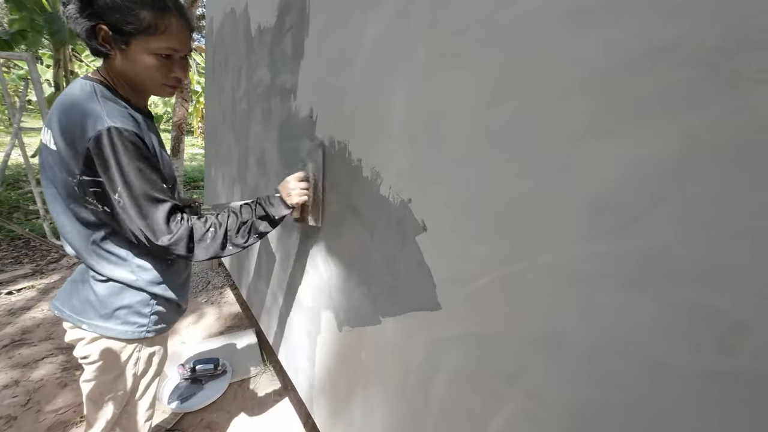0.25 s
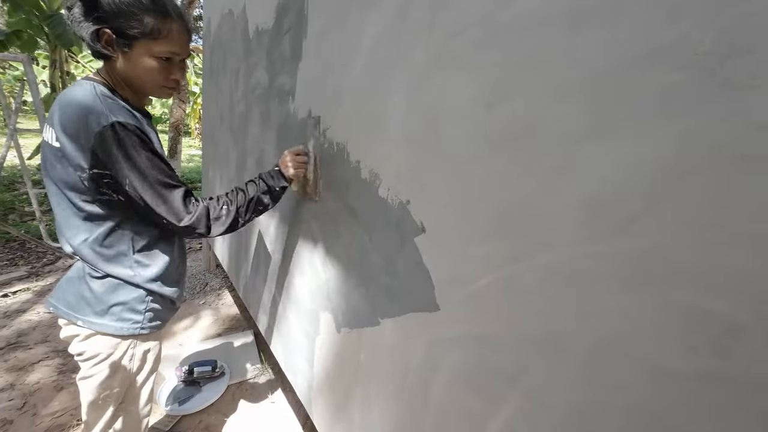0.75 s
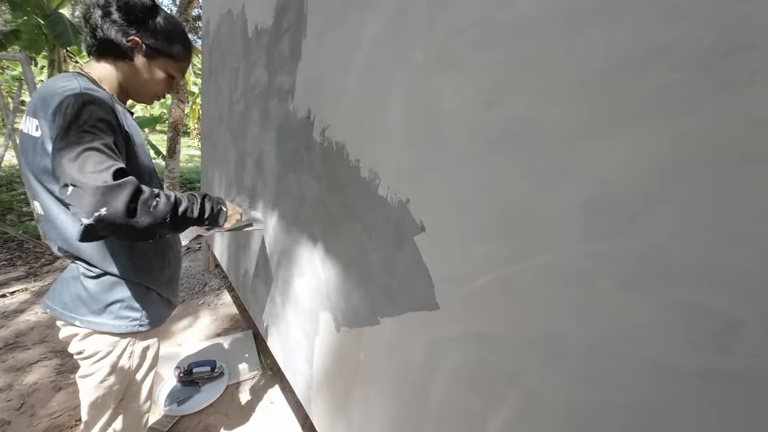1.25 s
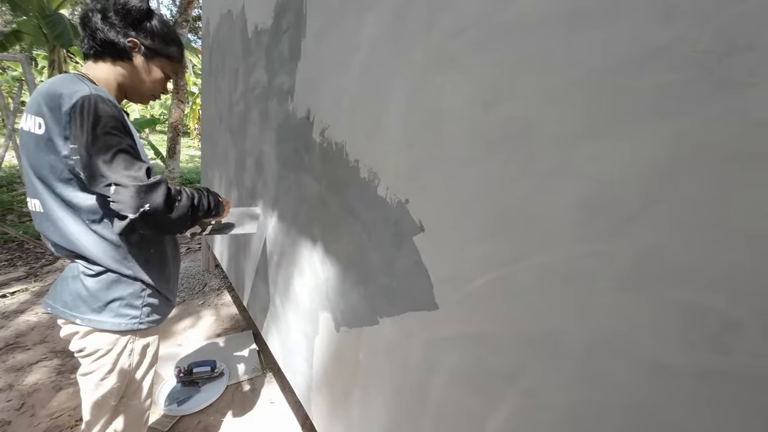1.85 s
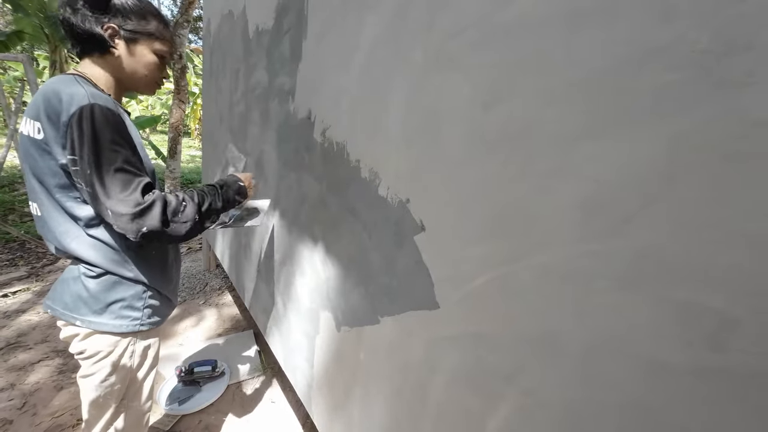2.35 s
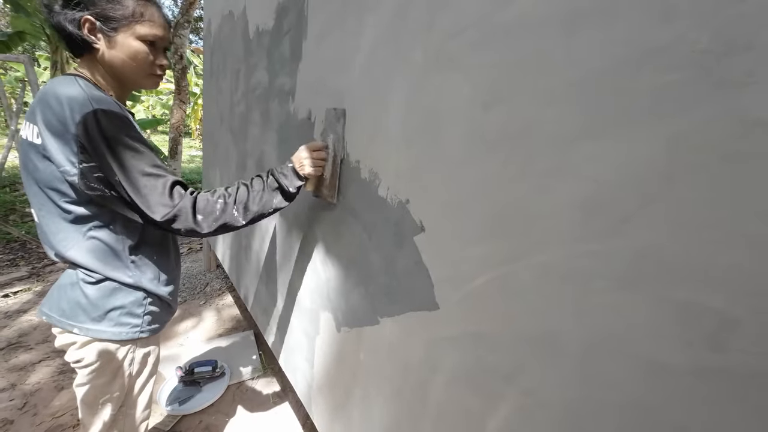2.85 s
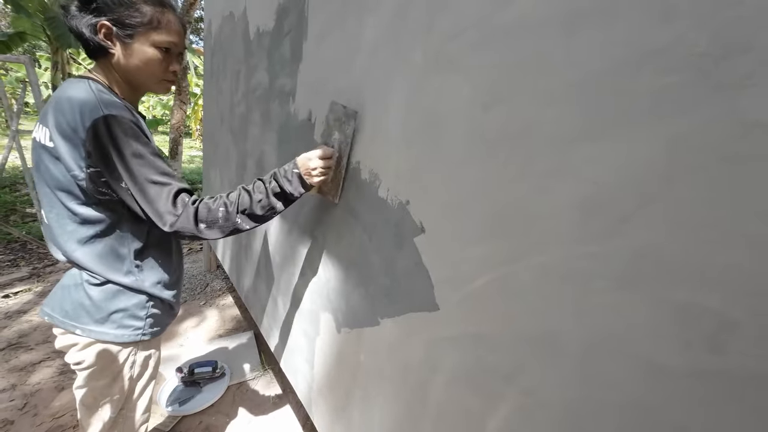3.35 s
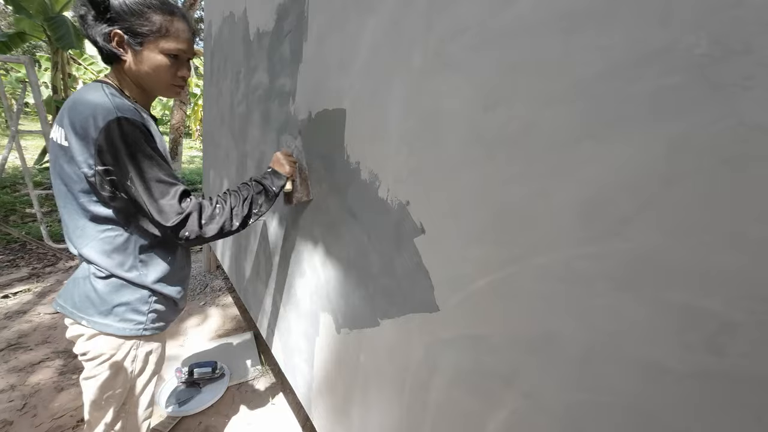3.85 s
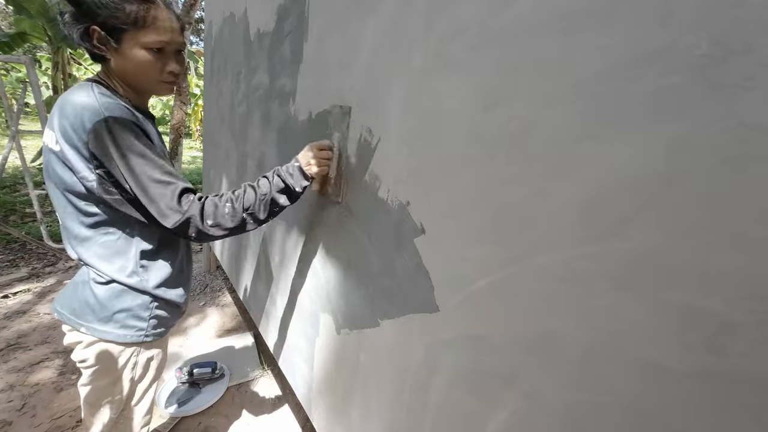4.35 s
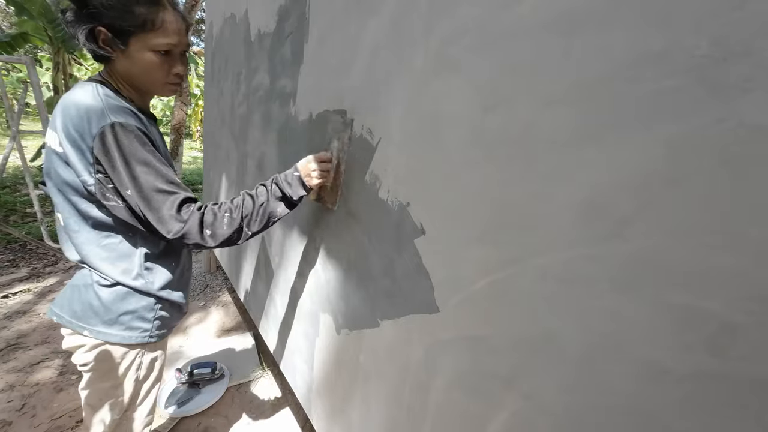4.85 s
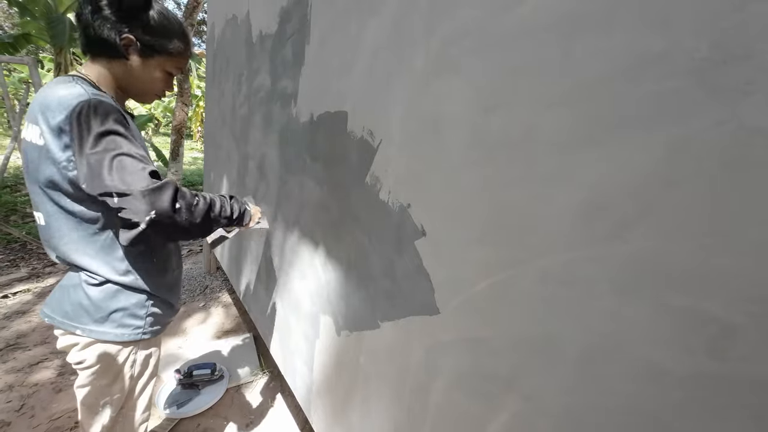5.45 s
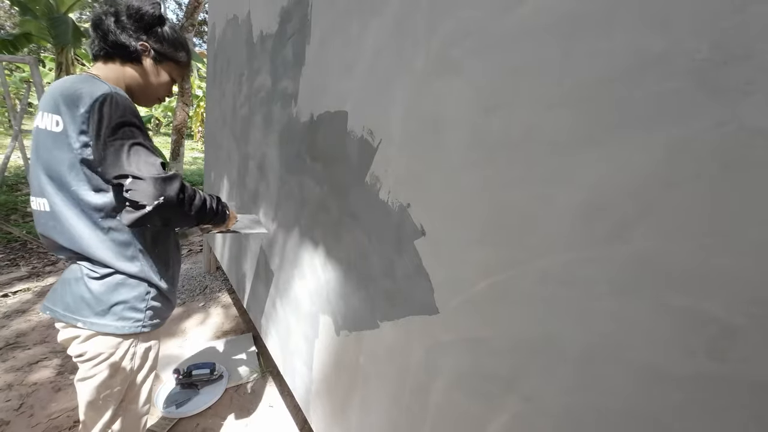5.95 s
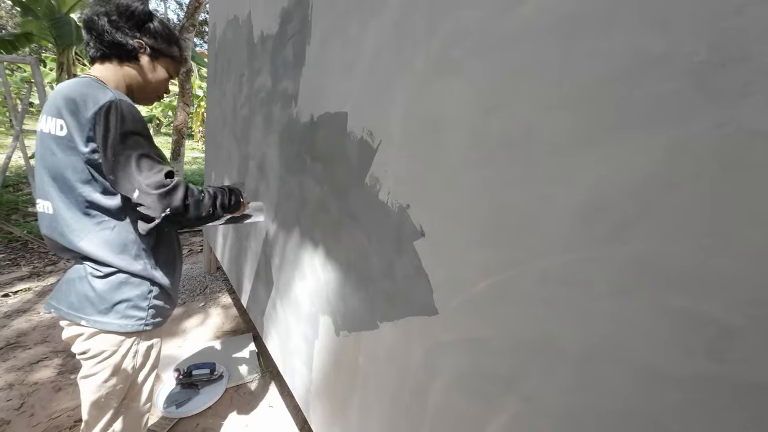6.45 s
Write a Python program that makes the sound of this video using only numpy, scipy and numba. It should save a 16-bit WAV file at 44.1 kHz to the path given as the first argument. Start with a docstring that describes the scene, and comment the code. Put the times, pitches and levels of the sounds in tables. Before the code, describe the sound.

A steel trowel spreads sandy plaster on a board wall, close to the microphone. A few gritty, hissing strokes come first, then a ringing scrape of steel on steel as more plaster is gathered from a second tool. After a pause, more short strokes follow with light knocks and brief squeaks, then another metallic scoop. A distant engine hums throughout, fading in and out over soft outdoor rumble.

```python
"""A steel trowel spreads sandy plaster on an outdoor board wall and scrapes more off a second tool.
Sand grains catch under its edge and make the blade ring. The blade knocks as it lands, its edge
sings now and then, and the board groans under a hard push.
An engine hums some way off, fading in and out, over a soft outdoor background."""
import sys
import numpy as np
from scipy import signal
from scipy.fft import rfft, irfft
from scipy.io import wavfile
from scipy.ndimage import uniform_filter1d, map_coordinates
from numba import njit

SR = 44100
rng = np.random.default_rng(int(sys.argv[2]) if len(sys.argv) > 2 else 0)


def master(y):
    """Save y as 16-bit WAV."""
    cut = np.clip(np.atleast_2d(y).T, -1, 1)
    pcm = np.round(cut * 32767)  # scale
    wavfile.write(sys.argv[1], SR, pcm.astype(np.int16))


N = 295029
TIME, FREQ = np.arange(N) / SR, np.fft.rfftfreq(N, 1 / SR)


def undb(db):
    """Turn decibels into a volume factor."""
    return 10 ** (np.asarray(db) / 20)


def curve(points):
    """Fill in a (time, value) table at every sample."""
    return np.interp(TIME, *np.transpose(points))


def across(points):
    """Fill in a (frequency, value) table at every frequency."""
    hz, value = np.transpose(points)
    return np.interp(np.log(FREQ + 1), np.log(hz), value)


def colour(x, points):
    """Shape the tone by a (frequency, level) table."""
    cepstrum = irfft(np.log(undb(across(points))), N)
    fold = np.r_[1, np.full(N // 2, 2), np.zeros(N - N // 2 - 1)]  # no ringing ahead of a sound
    response = irfft(np.exp(rfft(cepstrum * fold)), N)[:SR // 5]
    return irfft(rfft(x, 2 * N) * rfft(response, 2 * N))[..., :N]


def band(x, lo, hi, order=2):
    """Keep what lies between two frequencies."""
    return signal.sosfilt(signal.butter(order, [lo, min(hi, .49 * SR)], "band", fs=SR, output="sos"), x)


def below(x, hz):
    """Keep what lies under a frequency, without delay."""
    return signal.sosfiltfilt(signal.butter(2, hz, fs=SR, output="sos"), x)


def unit(x, lo, hi):
    """Scale a sound to strength 1 between two frequencies."""
    return x / np.std(band(x, lo, hi, order=4))


def walk(rate):
    """A smooth random wobble, roughly 1 in size, with `rate` steps a second."""
    k = int(SR / rate)
    steps = np.repeat(rng.standard_normal(N // k + 2), k)
    return 0.884 * uniform_filter1d(uniform_filter1d(steps, k), k)[:N]


@njit
def resonance(x, hz, width):
    """A filter that rings at a moving pitch; a narrow width rings longer."""
    out, band_state, low_state = np.empty(len(x)), 0., 0.
    for i in range(len(x)):
        tuning, damping = np.tan(np.pi * hz[i] / SR), width / hz[i]
        swing = (band_state + tuning * (x[i] - low_state)) / (1 + tuning * (tuning + damping))
        band_state = 2 * swing - band_state
        low_state += 2 * tuning * swing
        out[i] = damping * swing
    return out


def pressure(start, lean_s, ease_s, rise_db=8, fall_db=6.5, lift_s=0.014):
    """One stroke: the edge bites, the hand leans in, eases off and lifts."""
    t = TIME - start
    db = np.interp(t, [0, lean_s, lean_s + ease_s], [-rise_db, 0, -fall_db])
    bite = np.clip(t / (.4 * lean_s), 0, 1)
    lift = np.exp(-np.maximum(t - lean_s - ease_s, 0) / lift_s)
    return undb(db) * bite * lift


def scrape(strokes, modes, tone, grains_per_s, scatter_db, chatter_db, ring_db, drift, rasp_db, hiss_db):
    """Sand grains catch under the edge in uneven bursts and make the blade ring."""
    rasp, hiss, sizzle = np.zeros((3, N))
    for start, lean_s, ease_s, db, fine_db in strokes:
        contact = undb(db) * pressure(start, lean_s, ease_s)
        rasp += contact
        hiss += contact * undb(fine_db)
        sizzle += contact * undb(2.31 * fine_db + 3)  # light, fast strokes favour the finest grains
    sizes = undb(scatter_db * np.minimum(rng.exponential(size=N), 4)) * rng.choice([-1, 1], N)
    grains = sizes * (rng.random(N) < grains_per_s / SR) * undb(chatter_db * walk(140))
    # the ringing tones wander and trade strength as the contact moves along the blade
    flex, ring = walk(9), np.zeros(N)
    for hz, width, db in modes:
        strength = undb(db + 2 * walk(25))
        ring += strength * resonance(grains, hz * (1 + drift * (flex + walk(16))), float(width))
    sound = colour(0.29 * grains + undb(ring_db) * ring, tone)
    low = below(sound, 2410)
    body = unit(low, 700, 3000)
    # the crowded high tones flare up in changing patches
    treble, patches = rfft(sound - low), np.zeros(N)
    for hz in range(800, 17000, 800):
        window = np.maximum(1 - abs(FREQ - hz) / 800, 0)
        patches += undb(3 * walk(35)) * irfft(treble * window, N)
    sand = unit(patches, 4000, 12000)
    coarse = below(sand, 8500)
    return undb(rasp_db) * rasp * body + undb(hiss_db) * (hiss * coarse + sizzle * (sand - coarse))


def wall_strokes():
    """The trowel drags sandy plaster over the wall."""
    # hand strokes: start/s, leaning in/s, easing off/s, relative peak/dB, hiss against that peak/dB
    strokes = [ (0.0, 0.0046, 0.035, -38, -11.5), (.05, 0.097, 0.079, -39, -7.5),
               (.526, 0.0053, 0.0094, -35, -12), (.538, 0.03, 0.034, -50.5, -1.5),
               (.628, 0.021, 0.032, -40, -8), (.675, 0.064, 0.051, -36.5, -7.5),
               (.775, .065, 0.056, -43, -5.5), (3.04, 0.027, 0.037, -58.5, -2),
               (3.128, 0.059, 0.026, -50, -2.5), (3.514, 0.015, 0.043, -31, -15),
               (3.55, .07, 0.0045, -37.5, -5.5), (3.64, 0.015, 0.11, -53, -6.5),
               (3.71, 0.041, 0.0098, -42.5, -10.5), (3.785, 0.025, 0.0056, -43.5, -10),
               (3.853, .008, 0.035, -47.5, -11), (3.89, 0.044, .012, -48.5, -10),
               (4.335, 0.09, 0.047, -37.5, -7), (4.693, 0.0041, 0.0074, -44, -5),
               (4.738, 0.074, 0.0063, -41, -2), (4.87, 0.081, 0.029, -48, -5.5),
               (5.005, 0.078, 0.036, -44, -10), (5.115, 0.037, 0.035, -49, -7.5)]
    # ringing tones of the blade on the wall: f/Hz, width/Hz, level/dB
    modes = [(355, 50, -3), (860, 120, 0), (1170, 140, -3), (1300, 150, 0), (1642, 90, 4), (1850, 70, 1.5),
             (2240, 180, -2), (2800, 200, -5), (3560, 200, -10), (4925, 67, -17), (6300, 200, -14)]
    # tone of the scrape: f/Hz, level/dB
    tone = [(150, -44), (280, -17), (370, 7), (500, -27), (680, -8), (870, 1), (1300, 3.5), (2100, -5),
            (2900, -12), (4200, -13), (6200, -10), (9000, -16.5), (11000, -12), (16000, -21.5)]
    return scrape(strokes, modes, tone, grains_per_s=7000, scatter_db=3, chatter_db=1.5,
                  ring_db=-1.5, drift=.035, rasp_db=-3.5, hiss_db=0)


def rubbed(start, end, from_hz, to_hz, width, db):
    """Rubbing keeps one rough tone going; it swells and fades."""
    first, size = int(max(start, 0) * SR), max(int((end - start) * SR), SR // 50)
    hz = np.linspace(from_hz, to_hz, size)
    arch = np.sin(np.linspace(0, np.pi, size)).clip(0) ** 0.59
    tone = resonance(rng.standard_normal(size), hz, float(width))
    tone = resonance(tone, hz, float(width)) * arch
    return np.pad(undb(db) * tone / np.std(tone), (first, N))[:N]


def board_groans():
    """The board bends and groans under a hard push."""
    # pushes: start/s, end/s, f/Hz, width/Hz, relative level/dB
    pushes = [(0, 0.08, 355, 70.4, -49.5), (0.61, 0.743, 362, 69.4, -60), (3.513, 3.59, 348, 140, -51),
              (4.35, 4.47, 443, 200, -47.5), (4.36, 4.499, 89.5, 90.5, -38.5)]
    return undb(-1) * sum(rubbed(start, end, hz, hz, width, db) for start, end, hz, width, db in pushes)


def engine(start_hz=87.8, settled_hz=79.5, sag_s=5.6):
    """An engine slows a little. Only its lowest tones carry this far, fading in and out on the way."""
    # the tone at the firing rate: t/s, level/dB
    fundamental = [(0.0, -39), (0.33, -36), (1.15, -35.5), (1.53, -31), (1.96, -39.5), (2.1, -36),
                   (2.46, -38), (2.55, -43.5), (2.64, -64), (2.74, -47.5), (2.98, -40), (3.28, -36),
                   (3.99, -40.5), (4.45, -33), (4.79, -37.5), (5.22, -53.5), (5.5, -45.5), (6.69, -41)]
    # the tone an octave above: t/s, level/dB
    octave = [(0, -55.5), (1.2, -50), (2.4, -48), (2.65, -42.5), (3.5, -42), (3.75, -33.5), (4.1, -40.5),
              (4.3, -32), (4.9, -42.5), (5.55, -54), (5.78, -39), (6, -43), (6.69, -37)]
    # weaker tones: multiple of the firing rate, level/dB
    overtones = [(4 / 3, -62.5), (7 / 3, -65)]
    # other tones that swell in the hum: start/s, end/s, f/Hz, level/dB
    swells = [(1.55, 2.594, 200.7, -51.5), (2.162, 3.312, 281.8, -52.5), (4.902, 5.64, 234.4, -51.5),
              (5.8, 6.693, 275, -63)]
    firing_hz = settled_hz + (start_hz - settled_hz) * np.exp(-TIME / sag_s)
    phase = 2 * np.pi * np.cumsum(firing_hz * (1 + 0.0021 * walk(14))) / SR
    hum = undb(curve(fundamental) + walk(25)) * np.sin(phase)
    hum += undb(curve(octave) + walk(25)) * np.sin(2 * phase + rng.uniform(0, 2 * np.pi))
    for multiple, db in overtones:
        hum += undb(db + 3 * walk(1.4)) * np.sin(multiple * phase + 0.52 * walk(4.4))
    for start, end, hz, db in swells:
        swell = np.sin(np.pi * np.clip((TIME - start) / (end - start), 0, 1))
        hum += undb(db) * swell * np.sin(2 * np.pi * hz * TIME + 0.75 * walk(24.19))
    return np.sqrt(2) * hum


def outdoors(rumble_db=-47, wind_db=-55, wide_hz=5500):
    """Distant work noise and low rumble, with a little wind on each microphone."""
    # loudness of the distant noise: t/s, level/dB
    air_level = [(0, -58), (2, -56), (4.9, -53), (6.69, -55.5)]
    # its tone: f/Hz, level/dB
    air_tone = [(120, -21), (240, -8), (330, -10.5), (500, -9), (680, -13.5), (850, -8), (1300, -12),
                (2100, -15), (3000, -22), (4000, -28), (5600, -27), (8800, -38), (10500, -36), (12500, -55),
                (16000, -64)]
    # tone of the rumble: f/Hz, level/dB
    rumble_tone = [(15, -8), (25, -2), (45, 1), (70, -3), (130, -2), (200, -4), (260, -11), (340, -25),
                   (1000, -70)]
    mid, side = (colour(rng.standard_normal(N) * undb(walk(40)), air_tone) for _ in range(2))
    side = irfft(rfft(side) * np.clip((FREQ / wide_hz) ** 2, 0.15, 1), N)  # highs spread wider
    air = unit(mid + np.array([[1], [-1]]) * side, 300, 3000)
    # far machinery swells once, peaking at 5.46 s
    machinery_db = -53 - 10 * np.log10(1 + ((TIME - 5.46) / 0.62) ** 2)
    machinery = band(rng.standard_normal(N), 225, 550) * undb(1.5 * walk(17))
    rumble = colour(rng.standard_normal(N), rumble_tone) * undb(2 * walk(3.06))
    wind = band(rng.standard_normal((2, N)), 12, 62)
    lows = undb(machinery_db) * machinery / np.std(machinery) + undb(rumble_db) * rumble / np.std(rumble)
    return air * undb(curve(air_level)) + lows + undb(wind_db) * wind / np.std(wind)


def edge_singing(glide=0.037, width_hz=120):
    """The edge sings for a moment, sinking in pitch as the blade tilts."""
    # notes: start/s, length/s, f/Hz, relative level/dB
    notes = [(.095, 0.15, 1146, -44), (.12, 0.13, 1730, -43), (.129, 0.061, 2460, -45),
             (.54, 0.053, 2130, -45), (0.619, 0.053, 2165, -46), (0.717, 0.044, 2005, -39.5),
             (1.415, 0.066, 1405, -50), (3.169, 0.086, 1374, -47.5), (3.517, 0.041, 1130, -43),
             (4.28, 0.032, 1495, -42), (4.413, 0.059, 1580, -42), (4.772, 0.053, 2230, -42),
             (4.934, 0.041, 905, -44.5), (5.66, 0.165, 2020, -43.5), (5.696, .095, 1506, -48.5),
             (5.748, 0.091, 2780, -60)]
    return undb(-3) * sum(rubbed(s, s + length, hz * (1 + glide / 2), hz * (1 - glide / 2), width_hz, db)
                          for s, length, hz, db in notes)


def knocks(crunch_s=0.0067, ring_db=-9, gain_db=-14):
    """The blade lands or trips on a big grain: a tick, a crunch of sand and a short ring."""
    # hits: t/s, relative level/dB, treble boost/dB
    hits = [(0.118, -26.5, 0), (0.222, -33, -10), (0.526, -17.5, -10), (0.627, -31.5, 0), (1.419, -30, -21),
            (3.517, -19, -21), (3.619, -17.5, 5), (3.752, -39.5, 9), (3.812, -35, 1), (3.853, -33, 1),
            (4.282, -15, 0.5), (4.286, -22, -19), (4.445, -20, -15), (4.694, -37, 2), (4.877, -27.5, -16),
            (5.575, -30, -9)]
    # tone of the crunch: f/Hz, level/dB
    tone = [(150, -18), (400, -9), (650, -10), (900, -3), (1400, -1), (2000, 0), (3200, -10), (6000, -12),
            (8500, -24), (11000, -26), (16000, -40)]
    # ringing tones of the free blade: f/Hz, level/dB, time to fade by 60 dB/s
    modes = [(1168, -13, .045), (1464, -7, .09), (1669, -5, .045), (1879, -4, .035), (1997, 0, .03),
             (2498, -1, .022), (2670, -10, .05), (3343, -20, .05), (4199, -22, .05), (6368, -20, .047)]
    out, t = np.zeros(N + SR), TIME[:SR // 5]
    response = colour(1. * (TIME == 0), tone)[:512]
    for start_s, db, treble_db in hits:
        push = rng.standard_normal(len(t)) * np.exp(-t / crunch_s)
        push[0] = 2.5  # the first tick
        crunch = signal.fftconvolve(push, response)[:len(t)]
        hit = crunch / np.std(crunch[:256])
        for hz, mode_db, fade_s in modes:
            bent_hz = hz * (1 + 0.012 * rng.standard_normal())  # each hit bends the blade its own way
            fade = np.exp(-np.log(1000) * t / fade_s)
            hit += undb(ring_db + mode_db) * np.sin(2 * np.pi * bent_hz * t) * fade
        hit += (undb(treble_db) - 1) * band(hit, 1930, 14500, order=1)
        start = int(start_s * SR)
        out[start:start + len(t)] += undb(db + gain_db) * hit
    return out[:N]


def steel_scoops():
    """Steel scrapes on steel as the trowel gathers plaster from the second tool."""
    # scoops: start/s, leaning in/s, easing off/s, relative peak/dB, hiss against that peak/dB
    scoops = [(1.417, 0.0057, 0.016, -44, -25), (1.43, 0.097, 0.069, -42.5, -7),
              (1.6, 0.034, 0.14, -52.5, -6), (5.575, 0.12, 0.04, -41, -14), (5.66, 0.04, 0.019, -45.5, -27),
              (5.715, 0.057, 0.031, -38.5, -13), (5.86, 0.095, 0.21, -52.5, -9)]
    # ringing tones of the blade on the tool: f/Hz, width/Hz, level/dB
    modes = [(1130, 28, 3), (1347, 26, 4), (1512, 54, 0.5), (1935, 70, -4), (2350, 31, 1), (2730, 53, 0),
             (3540, 220, -0.5), (5000, 520, -9.5)]
    # tone of the scrape: f/Hz, level/dB
    tone = [(500, -36), (900, -19), (1400, -9), (2100, -5), (2800, -8), (3500, -15.5), (5200, -7.5),
            (7000, -5), (9000, -11), (11000, -7.5), (16000, -9)]
    return scrape(scoops, modes, tone, grains_per_s=9000, scatter_db=3.5, chatter_db=1.7,
                  ring_db=-4.5, drift=.022, rasp_db=-3, hiss_db=-1.5)


def skimming(ticks_per_s=90, scatter_db=2):
    """Loose grains flick against the barely touching blade."""
    # light touches: start/s, end/s, level/dB
    skims = [(2.936, 3.06, -73)]
    out = np.zeros(N)
    for start, end, db in skims:
        inside = (TIME > start) & (TIME < end)
        ticks = inside * (rng.random(N) < ticks_per_s / SR) * undb(scatter_db * rng.standard_normal(N))
        ticks = band(ticks, 6000, 11500)
        out += undb(db) * ticks / (np.std(ticks[inside]) + 1e-9)
    return out


def moving_echoes(x, echo_db=-10, travel=0.312, gap_s=.000025):
    """Echoes off the wall and the worker shift as the hand moves, sweeping the tone of the scrape."""
    out, samples = np.array([x, x]), np.arange(N)
    for delay_s in (.0011, .0024, .0043):
        lag = delay_s * np.exp(travel * walk(2.5))
        gap = gap_s * walk(6)  # one side hears the echo sooner
        echo = [map_coordinates(x, [samples - SR * (lag + side * gap)], order=3) for side in (-1, 1)]
        out += undb(echo_db) * np.array(echo)
    return out / np.sqrt(1 + 3 * undb(2 * echo_db))


def place(x, echo_db=-15, echo_s=0.021, wide_hz=4200):
    """Sound reaches two microphones directly and scattered off wall and ground; the highs spread out."""
    # how far the left side leads: f/Hz, phase/rad
    lead = [(100, 0), (3000, .05), (5500, .55), (8000, 1.05), (10500, 1.05), (12500, .2), (16000, .5)]
    # how much louder the left side is: f/Hz, level/dB
    balance = [(100, 0), (2800, 0), (4500, 1.2), (6600, -1), (9000, 2.5), (11200, 5.5), (12500, 0),
               (16000, 1)]
    t = TIME[:SR // 5]
    tails = rng.standard_normal((2, len(t))) * np.exp(-t / echo_s) * (t > .003)
    mid, side = rfft(tails / np.linalg.norm(tails, axis=1, keepdims=True), N)
    sign = np.array([[1], [-1]])
    direct = undb(sign * across(balance) / 2) * np.exp(.5j * sign * across(lead))
    scatter = undb(echo_db) * (mid + sign * side * np.minimum((FREQ / wide_hz) ** 2.5 * 2, 2.4))
    return irfft(rfft(x) * (direct + scatter), N)


def scene():
    """Trowel work close by, engine and background further off."""
    scrapes = moving_echoes(wall_strokes() + steel_scoops())
    trowel = scrapes + knocks() + edge_singing() + board_groans() + skimming()
    return place(trowel) + engine() + outdoors()


def record(dry, top_hz=15800):
    """The microphone openings weaken a strip of high treble; the very top is cut off."""
    # the dip in the treble: f/Hz, level/dB
    notch = [(9000, 0), (10500, 1), (11500, 0), (12000, -4), (12800, -12), (14000, -5), (15200, 1)]
    return signal.sosfilt(signal.ellip(10, .1, 80, top_hz, fs=SR, output="sos"), colour(dry, notch))


dry = scene()
out = record(dry)
master(out)
```